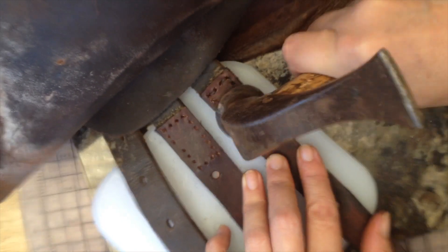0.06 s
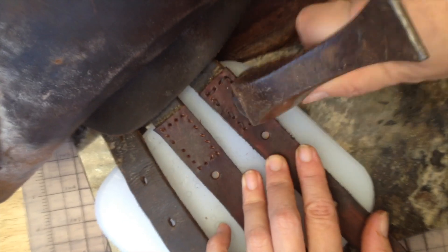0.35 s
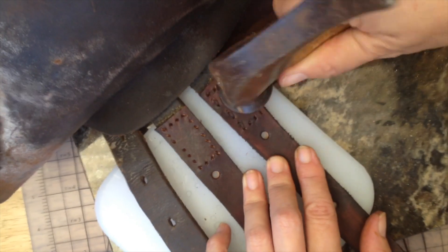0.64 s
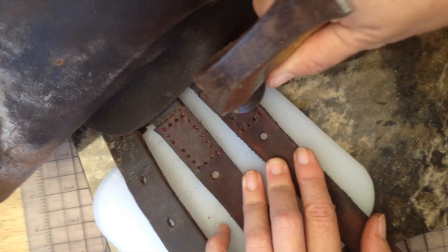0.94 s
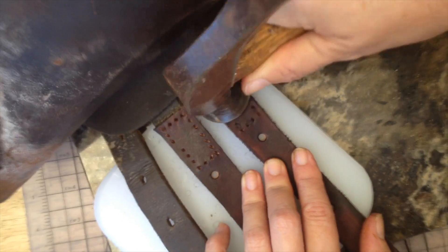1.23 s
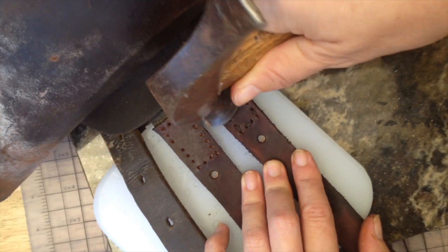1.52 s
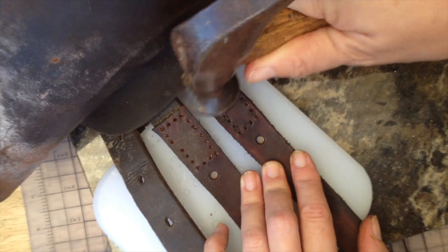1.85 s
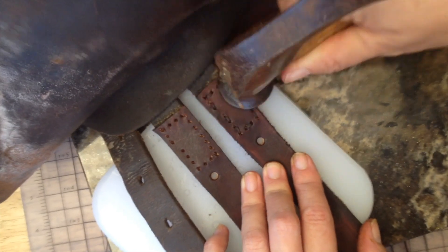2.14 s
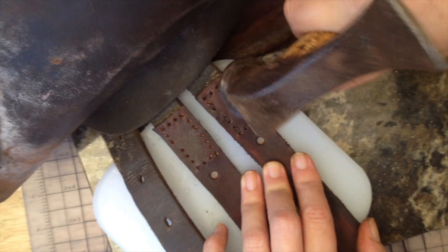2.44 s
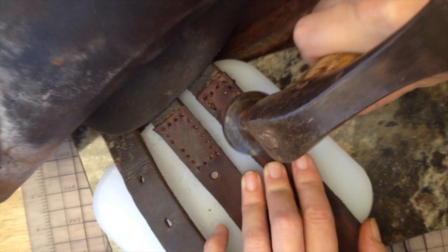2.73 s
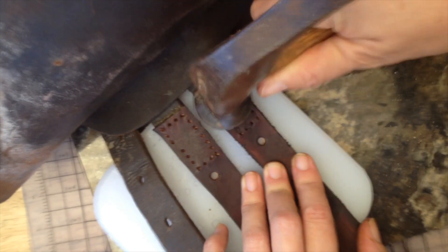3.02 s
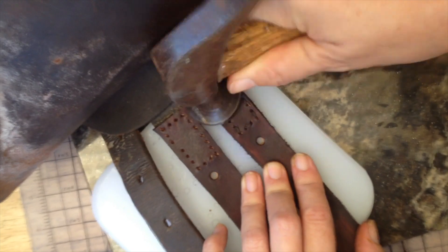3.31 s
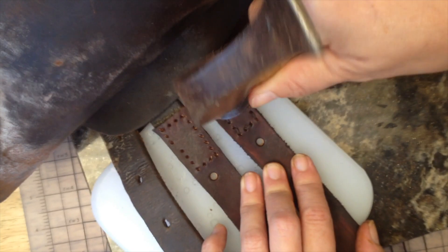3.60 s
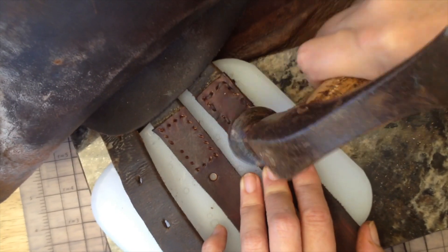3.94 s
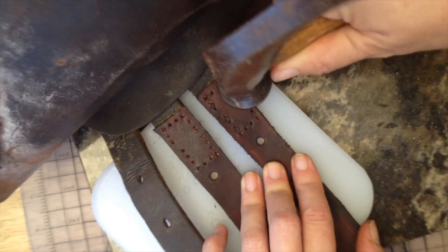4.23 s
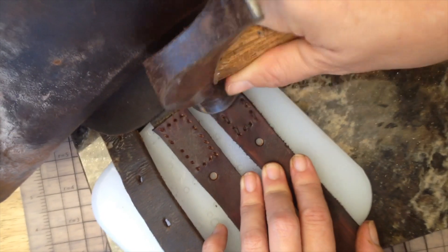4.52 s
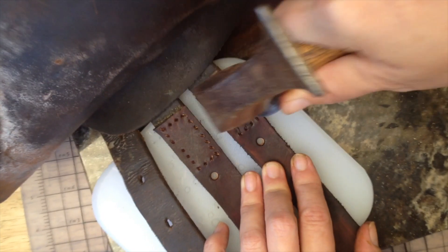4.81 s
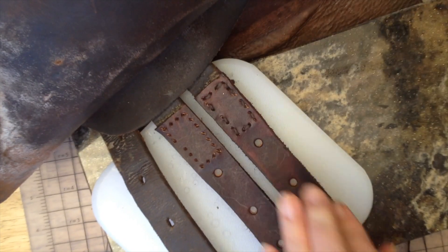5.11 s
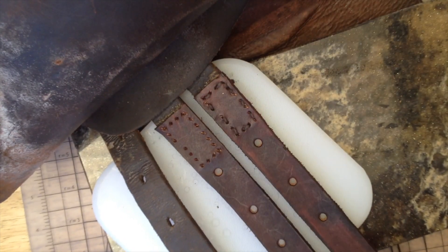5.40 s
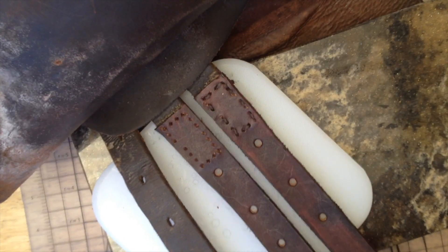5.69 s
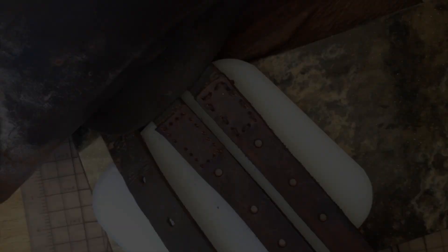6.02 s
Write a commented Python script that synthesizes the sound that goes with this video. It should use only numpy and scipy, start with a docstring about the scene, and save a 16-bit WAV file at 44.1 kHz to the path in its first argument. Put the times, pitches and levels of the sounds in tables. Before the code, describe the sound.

From the start, a steel hammer taps a leather strap lying on a plastic board over a stone slab. About twenty close, evenly paced strikes come at nearly four a second until 4.8 seconds. Each is a short, sharp slap with a slight ring and a small thud from the bench. They vary in brightness, with weaker ones near 2.0 and 4.5 seconds. The handle knocks hollowly on wood at about 0.6 and 2.1 seconds. From 2.7 seconds the bench rocks with soft, irregular low bumps, which continue after the tapping stops, with one tiny, faint squeak at 5.3 seconds. At 5.7 seconds the hammer is put down with a wooden knock and a bright steel clink on stone, rocking to rest by 6 seconds. The room is small and quiet, its faint background noise dipping at sharp taps and swelling back.

```python
"""A steel hammer taps the stitching of a leather strap flat on a plastic board lying on a stone slab.
Each impact slaps the leather and excites the damped modes of hammer, board, slab and bench.
Twice the handle knocks on wood; the bench starts to rock and bump, and one foot squeaks.
At the end the hammer is put down: it knocks, clinks and rocks to rest. The room is small and quiet.
The recorder's gain control ducks at sharp taps, so the room noise sinks and swells."""
import sys
import numpy as np
from scipy import signal
from scipy.fft import rfft, irfft, next_fast_len
from scipy.io import wavfile
from scipy.ndimage import uniform_filter1d

SR = 44100
rng = np.random.default_rng(int(sys.argv[2]) if len(sys.argv) > 2 else 0)


def transcribe(signal):
    """Save signal, clipped to [-1, 1], as a 16-bit WAV file at the path in sys.argv[1]."""
    frames = np.atleast_2d(signal).T
    limited = np.clip(frames, -1, 1)
    pcm = np.round(limited * 32767).astype(np.int16)
    wavfile.write(sys.argv[1], SR, pcm)


N = 267025
T = np.arange(SR // 5) / SR   # time axis of one event, in seconds

# Modes of the bench. Each row: frequency in Hz, level in dB, 60 dB decay time in seconds.
BENCH_MODES = [(108.4, -22, 0.39), (141.3, -10, 0.16), (189.5, -4, 0.15), (230, -1, 0.072),
               (307.3, -1, 0.071), (361, -5, 0.063), (529, -9, 0.057)]


def from_db(db):
    """Amplitude grows tenfold for every 20 dB."""
    return 10 ** (np.asarray(db) / 20)


def decay(t60):
    """Damping makes amplitude fall exponentially, by 60 dB in t60 seconds."""
    return np.exp(-np.log(1000) * T / t60)


def burst(t60):
    """An incoherent transient: exponentially decaying noise of unit energy."""
    noise = rng.standard_normal(len(T)) * decay(t60)
    return noise / np.linalg.norm(noise)


def add(track, start_s, sound):
    """Superposition: a sound adds linearly to the track from its start time."""
    at = max(round(start_s * SR), 0)
    track[at:at + len(sound)] += sound[:max(len(track) - at, 0)]


def colour(x, spectrum):
    """Minimum-phase filtering: folding the cepstrum gives a causal response with this spectrum."""
    size = 2 * next_fast_len(len(x))
    hz, db = np.transpose(spectrum)
    grid_hz = np.maximum(np.linspace(0, SR / 2, size // 2 + 1), 1)
    gain = from_db(np.interp(np.log(grid_hz), np.log(hz), db))
    cepstrum = irfft(np.log(gain))
    cepstrum[1:size // 2] *= 2
    cepstrum[size // 2 + 1:] = 0
    return irfft(rfft(x, size) * np.exp(rfft(cepstrum)))[:len(x)]


def soften(x, cut_hz):
    """A low-pass filter, which is how a compliant contact acts on a blow."""
    return signal.sosfilt(signal.butter(2, min(cut_hz, SR / 3), fs=SR, output="sos"), x)


def ring(modes, spread_db, detune=0):
    """Modal vibration: damped sines whose strength and, with the load, pitch vary from blow to blow."""
    chance = rng.standard_normal((len(modes), 2))
    out = np.zeros(len(T))
    for k, (hz, db, t60) in enumerate(modes):
        amplitude = (-1) ** k * from_db(db + spread_db * chance[k, 0])
        loaded_hz = hz * (1 + detune * chance[k, 1])
        out += amplitude * decay(t60) * np.sin(2 * np.pi * loaded_hz * T)
    return out


def room_noise(rms_db=-48):
    """Stationary Gaussian noise, strongest at low frequencies, forms the background of the room."""
    # Each row: frequency in Hz, relative spectral density in dB.
    spectrum = [(15, -44), (25, -88), (66, -15.5), (137, -2), (249, -2.5), (309, -5.5), (463, -9.5),
                (1020, -10.5), (1370, -12), (2110, -15.5), (2760, -16), (3160, -16), (4490, -18),
                (14800, -27), (16000, -52)]
    response = colour(signal.unit_impulse(len(T)), spectrum)
    noise = signal.oaconvolve(rng.standard_normal(N + len(T)), response, "valid")[:N]
    return from_db(rms_db) * noise / noise.std()


def hammer_taps(slap_db=25, head_db=15, board_db=8, slab_db=4, lead_in_db=3, rebound_db=22):
    """Impact excitation: each tap slaps the strap and sets hammer, board, slab and bench ringing."""
    # Each row: start in seconds, then force, brightness, board ring relative to force and thud in dB.
    strikes = [(0.0925, -17, 0, 1, -19.5), (0.3631, -16.5, -0.5, 0.5, -27.5), (0.6593, -15, -1, -13, -19.5),
               (0.9422, -15.5, 0, -10.5, -17), (1.2109, -13, -8.5, -19.5, -21.5),
               (1.481, -14, -9, -14.5, -19.5), (1.705, -17.5, -14.5, -16.5, -24),
               (1.955, -39.5, -20, -4.5, -27.5), (2.1808, -11.5, -5.5, -17.5, -19),
               (2.4143, -11, -8, -11.5, -21), (2.64, -14.5, -4.5, -4, -21),
               (2.874, -13.5, -6.5, -6.5, -20.5), (3.1056, -15.5, -15, -15, -20),
               (3.3422, -15.5, -14, -16.5, -19), (3.5741, -16, -12.5, -10.5, -18.5),
               (3.8057, -17, -16.5, 1, -19.5), (4.0322, -18.5, -5.5, 0.5, -18.5),
               (4.2601, -8.5, -9, -20, -16.5), (4.517, -37.5, -5.5, 3.5, -15.5),
               (4.7527, -14, -18.5, -15.5, -15.5)]
    # Modes of three bodies. Each row: frequency in Hz, level in dB, 60 dB decay time in seconds.
    head_modes = [(1463, -31.5, 0.054), (1662, -24.5, 0.066), (2320, -4.5, 0.0074), (2570, -3.5, 0.0056),
                  (3500, -1.5, 0.0062), (3520, -26, 0.09), (5720, -9.5, 0.0062)]
    board_modes = [(932, -5, 0.021), (1346, 1, 0.071), (1600, 9, 0.0049), (1640, -19, 0.13),
                   (2100, 4.5, 0.014), (2620, 8.5, 0.0026)]
    slab_modes = [(468, -6, 0.023), (735, -11.5, 0.025), (873, -6, 0.032), (1036, 5.5, 0.012)]
    lead_s, rebound_s, shelf_db = 0.0024, 0.001485, 10
    out = np.zeros(N)
    for start_s, force_db, bright_db, ring_db, thud_db in strikes:
        # a faint, soft burst of noise just before each tap
        lead_in = soften(burst(t60=0.013), cut_hz=6600)
        add(out, start_s - lead_s, from_db(force_db + lead_in_db) * lead_in)
        blow = from_db(force_db + slap_db) * leather_slap()
        blow += from_db(force_db + head_db) * ring(head_modes, spread_db=0, detune=0.0092)
        blow += from_db(force_db + ring_db + board_db) * ring(board_modes, spread_db=4)
        # a board that is free to ring also bounces back against the strap
        add(blow, rebound_s, from_db(force_db + ring_db + rebound_db) * leather_slap())
        # the weight behind the blow passes through the slab into the bench
        blow += from_db(thud_db + slab_db) * ring(slab_modes, spread_db=0.5, detune=0.017)
        blow += from_db(thud_db) * ring(BENCH_MODES, spread_db=-1, detune=0.028)
        top_db = bright_db + shelf_db   # a square blow is brighter than a slanting one
        blow = colour(blow, [(1900, 0.14), (4500, 0.39 * top_db), (9000, top_db)])
        add(out, start_s, room(blow))
    return out


def leather_slap(echo_s=0.001003, echo_db=-8, crush_db=-4, hiss_db=-13):
    """A brief contact is broadband: one pulse, its echo off the slab, the crush of fibres and thread."""
    # Each row: frequency in Hz, gain in dB.
    spectrum = [(40, -65), (150, -3), (400, 6), (650, 8.5), (1000, -7), (1800, -11), (2800, -7.5),
                (4200, 6), (5500, -2), (8000, -4), (11000, -7.5), (15000, -16)]
    pulse = from_db(crush_db) * burst(t60=0.022)
    pulse[0] += 1
    pulse[round(echo_s * SR)] += from_db(echo_db)
    # the treble scatters in all directions and returns as a smooth hiss
    hiss = signal.lfilter(*signal.butter(1, 1500, "high", fs=SR), burst(t60=0.21))
    return colour(pulse + from_db(hiss_db) * hiss, spectrum)


def room(blow, early_db=-16, tail_db=-14, early_s=0.003, tail_s=0.008):
    """Reflection adds echoes and a diffuse tail; hands and hammer move, so each blow scatters anew."""
    # Reflection from the walls. Each row: frequency in Hz, gain in dB.
    wall_spectrum = [(50, -15), (150, 1.5), (350, 9), (700, -0.5), (1400, -3.5), (3000, -5.5), (5500, -3.5),
                     (9000, -7.5), (15000, -4)]
    # Near surfaces. Each row: delay in seconds, level in dB.
    echoes = [(.0047, -26.5), (.0093, -35), (0.0114, -19)]
    scatter = np.zeros(len(T))
    add(scatter, early_s, from_db(early_db) * burst(t60=0.12))
    add(scatter, tail_s, from_db(tail_db) * burst(t60=0.17))
    paths = colour(scatter, wall_spectrum)
    paths[0] += 1   # direct sound
    for delay_s, db in echoes:
        add(paths, delay_s, from_db([db]))
    return signal.fftconvolve(blow, paths)[:len(T)]


def handle_knocks(wood_db=-3, tick_db=9, clatter_db=13):
    """The handle strikes wood: a dull contact tick, then the hollow resonance of its low modes."""
    # Each row: start in seconds, level in dB.
    knocks = [(0.6055, -7.5), (2.1490, -10.5)]
    # Each row: frequency in Hz, level in dB, 60 dB decay time in seconds.
    handle_modes = [(190, -8, .09), (339, -2, .085), (390, -3, .06), (435, -5, .06), (560, -1, .09),
                    (645, -8, .07), (760, -13, .05), (1028, -16, .03), (1500, -19, .035), (1850, -21, .04)]
    out = np.zeros(N)
    for start_s, level_db in knocks:
        tick = from_db(tick_db) * soften(burst(t60=0.029), cut_hz=2450)
        clunk = from_db(clatter_db) * soften(wood_clatter(t60=0.1), cut_hz=4600)
        hollow = from_db(wood_db) * ring(handle_modes, spread_db=4)
        add(out, start_s, from_db(level_db) * room(hollow + clunk + tick))
    return out


def wood_clatter(t60):
    """Modal overlap: the many close, damped modes of wood merge into a short rough clunk."""
    # Each row: frequency in Hz, gain in dB.
    spectrum = [(50, -34), (140, 9.5), (400, 9.5), (750, 8.5), (1100, 12), (1500, 2.5), (1900, 4),
                (2300, -48), (2700, -17), (4000, -27), (12000, -35)]
    return colour(burst(t60), spectrum)


def bench_rocking(count=58, gap_s=0.052, jitter=0.3, spread_db=4):
    """Irregular rocking gives a jittered train of small impacts, as pairs of seconds and dB."""
    # Strength of the rocking. Each row: time in seconds, level in dB.
    contour = [(2.701, -39), (3.45, -41), (3.8, -42.5), (4.18, -31), (4.85, -35.5), (5.0, -49), (5.2, -41),
               (5.38, -31.5), (5.68, -42)]
    when_s, strength_db = np.transpose(contour)
    chance = rng.standard_normal((count, 2))
    starts_s = when_s[0] + gap_s * (np.arange(count) + jitter * chance[:, 0])
    levels_db = np.interp(starts_s, when_s, strength_db) + spread_db * chance[:, 1]
    return list(zip(starts_s, levels_db))


def bench_bumps(push_db=41, body_db=-15, rumble_db=5, roll_s=0.071):
    """The bench rolls onto a foot and lands; a harder landing is a shorter pulse, hence brighter."""
    # Hard landings. Each row: start in seconds, level in dB.
    landings = [(2.789, -26.5), (3.016, -33), (3.182, -29), (3.404, -33), (3.453, -26.5), (3.499, -28),
                (3.638, -34.5), (3.895, -27.5), (3.984, -34), (4.199, -25), (4.231, -24), (4.397, -26),
                (4.577, -20.5), (4.646, -29.5), (4.805, -25.5), (5.284, -30.5), (5.351, -33.5),
                (5.436, -27.5)]
    # Response to a force at the foot. Each row: frequency in Hz, gain in dB.
    thud_spectrum = [(30, -25), (70, -14), (120, 5.5), (190, 7), (300, -2), (480, -8), (800, -23),
                     (2000, -65)]
    force, body = np.zeros((2, N))
    swell = np.sin(np.pi * np.minimum(T / roll_s, 1)) ** 2
    for start_s, level_db in landings + bench_rocking():
        push = soften(signal.unit_impulse(len(T)), cut_hz=1200 * from_db(0.33 * level_db))
        rumble = soften(swell * rng.standard_normal(len(T)), cut_hz=550)
        add(force, start_s, from_db(level_db + push_db) * push)
        add(force, start_s - 0.3 * roll_s, from_db(level_db + rumble_db) * rumble)
        add(body, start_s, from_db(level_db + body_db) * ring(BENCH_MODES, spread_db=3, detune=0.09))
    thud = colour(signal.unit_impulse(len(T)), thud_spectrum)
    return signal.oaconvolve(force, thud)[:N] + soften(body, cut_hz=240)


def foot_squeak(length_s=0.03, sag_hz_per_s=900):
    """Friction at a bench foot gives a faint chirp whose pitch sags slightly as the slip slows."""
    # One row: time in seconds, starting frequency in Hz, level in dB.
    slip = (5.283, 3600, -40.5)
    at_s, hz, level_db = slip
    swell = np.sin(np.pi * np.minimum(T / length_s, 1)) ** 2
    phase = 2 * np.pi * np.cumsum(hz - sag_hz_per_s * T) / SR
    out = np.zeros(N)
    add(out, at_s - length_s / 4, from_db(level_db) * swell * np.sin(phase))
    return out


def hammer_set_down(wood_db=-8, clatter_db=23, steel_db=-9.5, crack_db=17):
    """Rocking dies out in impacts: handle and head land in turn; steel cracks on stone and rings on."""
    # Each row: start in seconds, wood level in dB, contact cut-off in Hz, steel level in dB.
    contacts = [(5.7091, -15.5, 1930, -14.5), (5.7461, -8, 1500, -50), (5.7502, -9.5, 2400, -6.5),
                (5.8474, -11.5, 1450, -28), (5.8526, -50, 900, -46), (5.9316, -17.5, 860, -40.5),
                (5.982, -27.5, 460, -58)]
    # Modes of two bodies. Each row: frequency in Hz, level in dB, 60 dB decay time in seconds.
    wood_modes = [(201, -7, 0.2), (258, -7, 0.15), (383.6, -4, 0.19), (445, -3, 0.081), (570.3, 0.5, 0.2),
                  (745, -8.5, 0.19), (1002, -1.5, 0.053), (1350, -9, 0.017), (1640, -8, 0.034),
                  (1820, 0.5, 0.031), (2617, 3.5, 0.052)]
    steel_modes = [(2620, -18, .07), (4082, -7, .13), (4110, -5, .15), (6320, -12, .1), (6562, -8, .11),
                   (6764, -13, .1), (7600, -11, .12), (8190, -18, .11), (10050, -17, .1), (11310, -21, .1),
                   (13300, -19, .1)]
    # Each row: frequency in Hz, gain in dB.
    crack_spectrum = [(500, -1), (2600, 1.5), (3200, -5), (4100, 14), (4900, -3.5), (5700, -3.5),
                      (6600, 7.5), (7600, 4.5), (9000, -4), (10200, -2), (12000, -15), (13500, 7.5),
                      (15000, -30)]
    out = np.zeros(N)
    for start_s, knock_db, contact_hz, clink_db in contacts:
        knock = from_db(wood_db) * ring(wood_modes, spread_db=4, detune=0.0043)
        knock += from_db(clatter_db) * wood_clatter(t60=0.13)
        clink = from_db(steel_db) * ring(steel_modes, spread_db=-1.5)
        clink += from_db(crack_db) * colour(burst(t60=0.1), crack_spectrum)
        landing = from_db(knock_db) * soften(knock, contact_hz) + from_db(clink_db) * clink
        add(out, start_s, room(landing))
    return out


def gain_control(x, band_hz=(2580, 6070), limit_db=-12.5, recover_db_per_s=9):
    """Look-ahead limiting: upper-mid power over the limit ducks the gain, which then creeps back."""
    window_s, ahead_s, start_duck_db = 0.00184, 0.0034, 4.5
    t = np.arange(N) / SR
    sensed = signal.sosfilt(signal.butter(2, band_hz, "band", fs=SR, output="sos"), x)
    power = uniform_filter1d(sensed ** 2, round(window_s * SR))
    level_db = 10 * np.log10(np.maximum(power, 1e-12))
    over_db = np.maximum(level_db - limit_db, 0)
    over_db[0] = start_duck_db   # the work is already under way
    recovery_db = recover_db_per_s * t
    duck_db = np.maximum.accumulate(over_db + recovery_db) - recovery_db
    return x * from_db(-np.interp(t + ahead_s, t, duck_db))


def scene():
    """The pressures of the bench work and the room noise superpose in one channel."""
    work = hammer_taps() + bench_bumps() + foot_squeak() + handle_knocks() + hammer_set_down()
    return (work + room_noise())[None]


def record(dry, low_hz=58, stop_hz=16200):
    """Band limiting and compression: the recorder thins the bass, ducks, rounds peaks, cuts the top."""
    thin = signal.sosfilt(signal.butter(2, low_hz, "high", fs=SR, output="sos"), dry)
    rounded = np.tanh(gain_control(thin[0]))
    return signal.sosfilt(signal.cheby2(20, 70, stop_hz, fs=SR, output="sos"), rounded)[None]


dry = scene()
out = record(dry)
transcribe(out)
```